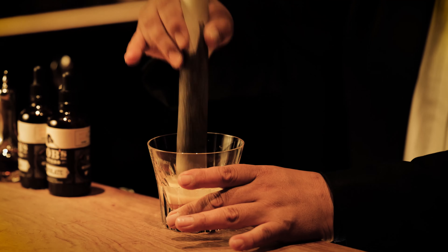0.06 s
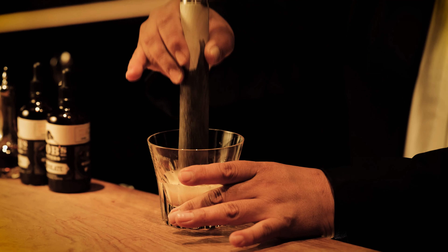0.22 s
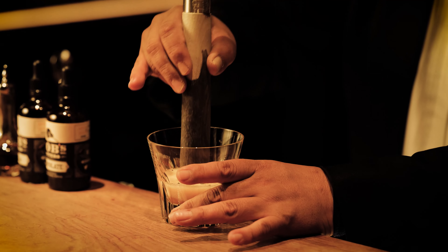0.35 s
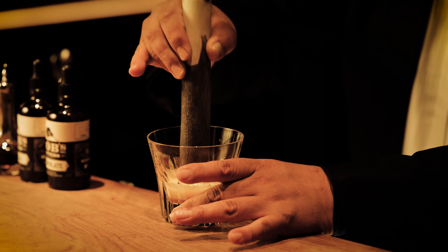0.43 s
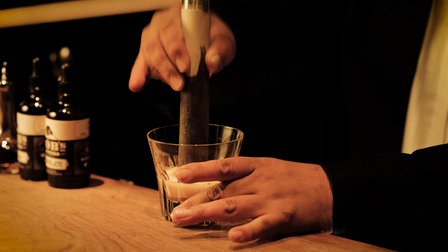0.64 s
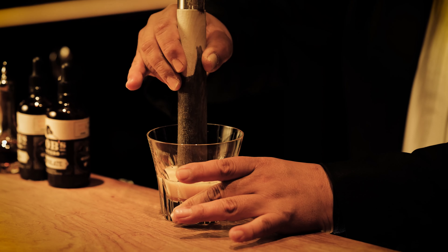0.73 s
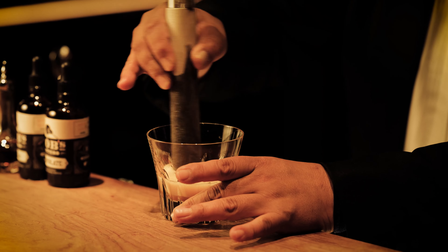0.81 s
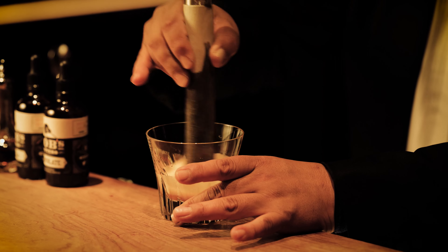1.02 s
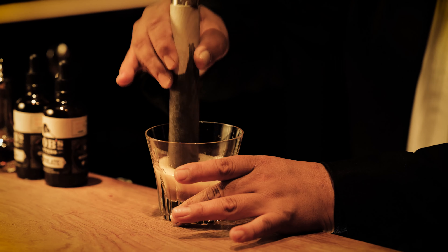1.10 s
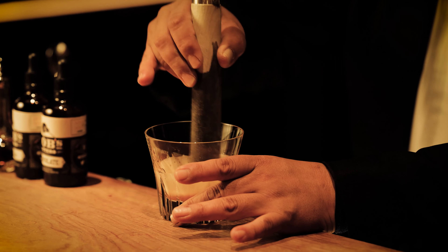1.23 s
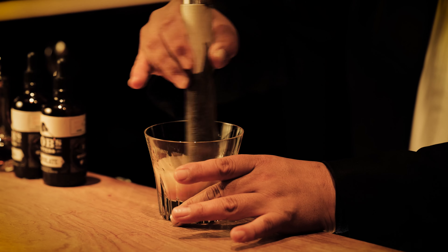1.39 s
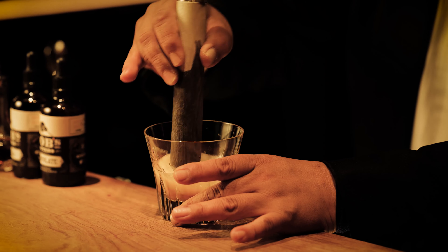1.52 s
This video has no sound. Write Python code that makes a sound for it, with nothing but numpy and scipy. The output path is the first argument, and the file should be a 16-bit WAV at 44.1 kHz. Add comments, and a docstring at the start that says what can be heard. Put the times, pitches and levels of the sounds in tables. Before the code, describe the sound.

Four quick muddler thuds in a hand-held glass on wood, followed by faint high clinks.

```python
"""A muddler is driven four times into a glass held on a wooden bar counter, in a small quiet room.
Each knock booms through the counter while the hand-damped glass ticks and rings briefly.
Then the muddler is twisted: a few light, high clinks over soft bumps of the counter.
The stereo microphone stands far enough off that the echoes of a knock outweigh its direct sound.
Ventilation and a faint electrical whine lie underneath."""
import sys
import numpy as np
from scipy import signal
from scipy.fft import rfft, irfft
from scipy.io import wavfile
from scipy.ndimage import uniform_filter1d

SR = 44100
rng = np.random.default_rng(int(sys.argv[2]) if len(sys.argv) > 2 else 0)


def pcm_store(signal):
    """Save signal as 16-bit PCM."""
    levels = np.round(np.clip(np.atleast_2d(signal), -1, 1) * 32767)
    wavfile.write(sys.argv[1], SR, levels.astype(np.int16).T)


N = 68355
T = np.arange(int(.6 * SR)) / SR  # time within one contact
HZ = np.maximum(np.fft.rfftfreq(8192, 1 / SR), 1)  # frequency axis of the filters

# Levels in the tables are relative; decay_s is the time to fall 60 dB.
# stereo width at the microphone, side against middle: frequency_hz, side_db
STEREO_WIDTH = [(30, -2.5), (60, -23), (130, -48.5), (250, -43.5), (500, -19.5), (1000, -11), (2500, -7),
                (8000, -18), (14000, -8)]
# how long the room's early reflections hold their level: frequency_hz, hold_s
ECHO_HOLD = [(100, 0.044), (400, 0.031), (1000, 0.029), (2500, .008), (14000, .005)]
# how the echoes die after that: frequency_hz, decay_s
ECHO_DECAY = [(100, 0.15), (270, 0.26), (500, 0.21), (1000, .23), (2500, 0.19), (6000, 0.34), (14000, 0.11)]
# spectrum of the ventilation: frequency_hz, level_db
VENTILATION = [(20, -42.5), (55, -39), (85, -23), (130, 3), (170, -7), (260, 1.5), (340, -10.5),
               (460, -3.5), (1100, -15), (1500, -17), (3100, -23.5), (4700, -38), (9000, -40.5),
               (11000, -43.5), (12500, -43), (16000, -56)]
# the glass at each knock: start_s, level_db, lower_db, top_db, crunch_db, low_ring_db, high_ring_db
GLASS_TICKS = [(0.1995, -17, 8, 3, -35, -63.5, -63), (0.3756, -8, -4.5, -3, -31, -65.5, -59),
               (0.5611, -15.5, -11, 0.5, -20, -49.5, -65), (.7205, -25.5, 5.5, 3.5, -36.5, -62, -74.5)]
# broad resonances of the glass, damped by the hand: centre_hz, width_hz, level_db
GLASS_RESONANCES = [(3340, 500, 0), (5210, 220, -2.5), (7970, 200, -14.5), (9850, 550, -5), (11380, 75, 2),
                    (12500, 340, -0.5), (13950, 300, -6), (14950, 350, -5)]
# clear low modes of the glass: pitch_hz, level_db, decay_s
GLASS_LOW_MODES = [(2835, 7, 0.16), (3284, -12, 0.44)]
# clear high modes of the glass: pitch_hz, level_db, decay_s
GLASS_HIGH_MODES = [(10800, -4.5, .14), (13950, 4.5, 0.15), (14600, -7, .15)]
# blows of the muddler: start_s, level_db, boom_db, hollow_db, hollow_hz, corner_hz, rolloff_order,
# seat_delay_s, seat_db, tock_db
MUDDLER_KNOCKS = [(.2010, 15.5, 9.5, 3.5, 1000, 1415, 10.6, 0.022, -4, -46),
                  (0.3748, 17.5, 5.5, 12.5, 927, 1206, 4.2, 0.0089, -14, -43.5),
                  (0.56, 30, -1.5, 4.5, 1042, 2160, 9.5, 0.0062, -17.5, -42.5),
                  (.7195, 27, 0, 3, 790, 1337, 5.14, .007, -6.5, -46)]
# dense response of the wooden counter: frequency_hz, gain_db
COUNTER_RESPONSE = [(25, -45), (62, -44), (85, -16.5), (125, -28.5), (200, -3.5), (290, -1), (460, 3.5),
                    (560, -1), (670, -3), (770, -2.5), (850, -10), (950, -3.5), (1150, -4.5), (1300, -10),
                    (1430, -7), (1620, -16), (1800, -9), (2200, -14), (4000, -13)]
# modes of the counter with the glass on it: pitch_hz, level_db, decay_s
COUNTER_MODES = [(138.7, -64, 0.36), (193.3, -59, 0.23), (296.2, -50, 0.29), (401.5, -63, 0.42),
                 (453.6, -54, 0.3), (490.3, -62, .28), (635.9, -53, 0.25), (737, -53.5, 0.21),
                 (777, -51, 0.067), (898.4, -51, 0.16), (939, -57.5, 0.24), (1022, -71, 0.36),
                 (1203, -55.5, 0.24), (1386, -55.5, 0.094), (1408, -75.5, .22), (1431, -71, 0.44),
                 (1910, -71.5, .2)]
# short hollow note of the blow itself: pitch_hz, level_db, decay_s
TOCK_MODES = [(790, -2, 0.038), (891, -5.5, 0.052)]
# a blow's deep thump returning from the room: delay_s, pitch_hz, half_length_s, level_db
THUMP_RETURNS = [(0.03, 118.5, 0.013, -33.5), (0.06, 165, 0.0094, -31), (.077, 178, .009, -39)]
# soft pushes on the counter while twisting: start_s, level_db
TWIST_PUSHES = [(0.961, 3.5), (1.179, 5.5), (1.375, 1.5)]
# light touches on the glass while twisting: start_s, level_db, centre_hz, width_octaves, room_db
TWIST_CLINKS = [(0.965, -11, 10400, 0.13, -4.5), (1.091, -16, 14200, .07, -4),
                (1.185, -24, 8100, 0.82, -14), (1.257, -26, 10700, 0.32, -9),
                (1.340, -24, 12000, 0.44, -17), (1.363, -25.5, 10100, 0.19, -8),
                (1.424, -28, 15000, .1, -8), (1.481, -28, 10200, .35, -7), (1.502, -30, 15000, 0.29, -12)]

GLASS_SPLIT_HZ, GLASS_TOP_HZ = 7000, 12000  # where the glass's lower range ends and its top begins


def amp(db):
    """Decibels to gain."""
    return 10 ** (np.asarray(db) / 20)


def curve(points, hz):
    """A table's value on a log-frequency axis."""
    table_hz, values = np.transpose(points)
    return np.interp(np.log(hz + 1), np.log(table_hz + 1), values)


def bell(hz, octaves):
    """A smooth hump around a frequency."""
    return np.exp(-.5 * (np.log2(HZ / hz) / octaves) ** 2)


def add(mix, start_s, sound):
    """Places a stereo sound at a time."""
    part = mix[:, round(start_s * SR):][:, :sound.shape[1]]
    part += sound[:, :part.shape[1]]


def colour(x, gain):
    """Minimum-phase filter with the given gain at each frequency."""
    log_gain = np.log(np.maximum(gain, gain.max() * 1e-5))
    mirrored = np.r_[log_gain, log_gain[-2:0:-1]]
    taps = np.fft.ifft(np.exp(np.conj(signal.hilbert(mirrored)))).real
    return signal.fftconvolve(x, taps[None, :len(taps) // 2], axes=1)[:, :x.shape[1]]


def stereo(noises):
    """Turns two unrelated noises into the microphone's left and right, alike in the bass."""
    mid, side = rfft(noises)
    n = noises.shape[1]
    width = amp(curve(STEREO_WIDTH, np.fft.rfftfreq(n, 1 / SR)))
    return irfft((mid + width * np.array([side, -side])) / np.sqrt(1 + width ** 2), n)


def room_tone(air_db=-53, whine_hz=10010, whine_db=-84):
    """Steady ventilation with a faint electrical whine."""
    noise = stereo(rng.standard_normal((2, N)))
    air = irfft(rfft(noise) * amp(curve(VENTILATION, np.fft.rfftfreq(N, 1 / SR))), N)
    whine = np.sin(2 * np.pi * whine_hz * np.arange(N) / SR)
    return amp(air_db) * air / air.std() + amp(whine_db) * whine


def even_noise(frame=1024, passes=4):
    """Two noises whose energy is spread evenly over time and frequency."""
    noise = rng.standard_normal((2, len(T)))
    for _ in range(passes):
        spectra = signal.stft(noise, nperseg=frame)[2]
        noise = signal.istft(spectra / (abs(spectra) + 1e-12), nperseg=frame)[1][:, :len(T)]
    return noise / noise.std()


def reflections(frame=256, build_cycles=1.9, fade_power=1.316, smooth_hz=70):
    """The small room's dense echoes: they build up, bass last, hold, then die away."""
    hz, t, spectra = signal.stft(stereo(even_noise()), SR, nperseg=frame)
    hz = np.maximum(hz, 100)[:, None]
    build = 1 - np.exp(-(t + 0.00036) * hz / build_cycles)
    fading_s = np.maximum(t - curve(ECHO_HOLD, hz), 0)
    fade = amp(-60 * (fading_s / curve(ECHO_DECAY, hz)) ** fade_power)
    echoes = signal.istft(spectra * fade * build, nperseg=frame)[1][:, :len(T)]
    # flatten the overall spectrum, so that the struck object sets the colour
    power = (abs(rfft(echoes, 2 * (len(HZ) - 1))) ** 2).mean(0)
    smooth_bins = round(smooth_hz / (HZ[-1] - HZ[-2]))
    return colour(echoes, uniform_filter1d(power, smooth_bins) ** -.5)


def scrape(length_s=0.0071):
    """A few milliseconds of gritty contact, of unit energy."""
    grit = stereo(rng.standard_normal((2, len(T)))) * np.sin(np.pi * np.minimum(T / length_s, 1))
    return grit / np.linalg.norm(grit[0])


def ringing(modes, damping_power=1.533):
    """Modes die ever faster as the hand damps them; each reaches left and right a little out of step."""
    ring = np.zeros((2, len(T)))
    for hz, db, decay_s in modes:
        phase, side = 2 * np.pi * rng.random(), rng.choice([-1, 1])
        phase_apart = side * np.arctan(amp(curve(STEREO_WIDTH, hz))) * np.array([[1], [-1]])
        envelope = amp(db - 60 * (T / decay_s) ** damping_power)
        ring += envelope * np.sin(2 * np.pi * hz * T + phase + phase_apart)
    return ring


def glass_response():
    """Gain of the held glass's broad resonances at each frequency."""
    return sum(amp(db) / (1 + 2 * ((HZ - hz) / width) ** 2) for hz, width, db in GLASS_RESONANCES)


def glass_tick(level_db, lower_db, top_db, crunch_db, low_ring_db, high_ring_db, direct_db=-20):
    """Hard contact with the glass: a bright snap, its echoes and a thin ring."""
    range_db = lower_db * (HZ < GLASS_SPLIT_HZ) + top_db * (HZ > GLASS_TOP_HZ)
    crunch = amp(crunch_db) * bell(hz=5200, octaves=0.48)
    gain = glass_response() * amp(level_db + range_db) + crunch
    ring = amp(low_ring_db) * ringing(GLASS_LOW_MODES) + amp(high_ring_db) * ringing(GLASS_HIGH_MODES)
    snap_band = amp(-7) * bell(hz=12000, octaves=0.38)
    snap = colour(scrape(), (gain + amp(level_db - 18.5)) * snap_band)
    body = colour(amp(direct_db) * scrape() + reflections(), gain)
    return snap + body + ring


def impulse(delay_s):
    """A one-sample blow after a delay."""
    return 1. * (np.arange(len(T)) == round(delay_s * SR))


def counter_knock(echoes, wood_ring, level_db, boom_db, hollow_db, hollow_hz, corner_hz, rolloff_order,
                  seat_delay_s, seat_db, tock_db):
    """The muddler lands and seats; a harder blow reaches higher into the counter's response."""
    boom_hz, low_cut_hz = 462, 93
    direct_db, fresh_echo_db, tock_rise_s = -13.5, -8, 0.0076
    tone_db = boom_db / (1 + (HZ / boom_hz) ** 10) + hollow_db * bell(hollow_hz, octaves=0.27)
    rolloff = np.sqrt((1 + (HZ / corner_hz) ** (2 * rolloff_order)) * (1 + (low_cut_hz / HZ) ** 4))
    contacts = amp(direct_db) * impulse(0) + amp(seat_db) * impulse(seat_delay_s)
    fresh_echoes = amp(fresh_echo_db) * reflections()  # the part that changes from blow to blow
    body = colour(contacts + echoes + fresh_echoes, amp(curve(COUNTER_RESPONSE, HZ)))
    tock = amp(tock_db) * ringing(TOCK_MODES) * (1 - np.exp(-T / tock_rise_s))
    return colour(body + wood_ring + tock, amp(level_db + tone_db) / rolloff)


def room_thump(rise_s=0.03):
    """A blow's deep thump swells and fades with each return from the room."""
    thump = np.zeros(len(T))
    for delay_s, hz, half_length_s, db in THUMP_RETURNS:
        swell = amp(db) * np.exp(-.5 * ((T - delay_s) / half_length_s) ** 2)
        thump += swell * np.sin(2 * np.pi * (hz * T + rng.random()))
    return thump * np.minimum(T / rise_s, 1)


def counter_push(level_db, centre_hz=256):
    """The twisting muddler gives the counter a dull, soft bump."""
    band = bell(centre_hz, octaves=0.33) + amp(-19.5) * bell(centre_hz, octaves=1)
    return colour(reflections(), amp(level_db) * band)


def glass_clink(level_db, centre_hz, width_octaves, room_db, direct_db=-14):
    """A light touch wakes only some of the glass's high resonances."""
    woken_band = bell(centre_hz, width_octaves) + amp(-21) * (HZ > GLASS_SPLIT_HZ)
    gain = amp(level_db) * (glass_response() + amp(-16)) * woken_band
    return colour(amp(direct_db) * scrape() + amp(room_db) * reflections(), gain)


def scene():
    """Four knocks, then the twist, over the room tone; every knock drives the same counter and room."""
    mix = room_tone()
    echoes = reflections()
    wood_ring = ringing(COUNTER_MODES) * (1 - np.exp(-T / 0.022))  # builds over about 22 ms
    thump = room_thump()
    for start_s, *blow in MUDDLER_KNOCKS:
        add(mix, start_s, counter_knock(echoes, wood_ring, *blow) + thump)
    for start_s, *contact in GLASS_TICKS:
        add(mix, start_s, glass_tick(*contact))
    for start_s, *touch in TWIST_CLINKS:
        add(mix, start_s, glass_clink(*touch))
    for start_s, level_db in TWIST_PUSHES:
        add(mix, start_s, counter_push(level_db))
    return mix


def record(dry):
    """The recorder passes the microphone's signal up to 15.9 kHz."""
    lowpass = signal.firwin(511, 15900, window=("kaiser", 9), fs=SR)
    return signal.oaconvolve(dry, lowpass[None], "same")


dry = scene()
out = record(dry)
pcm_store(out)
```